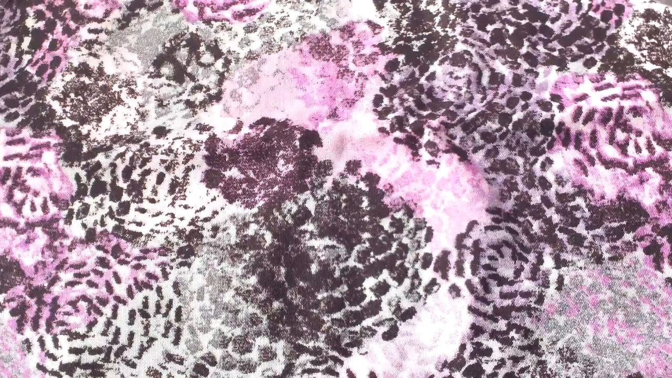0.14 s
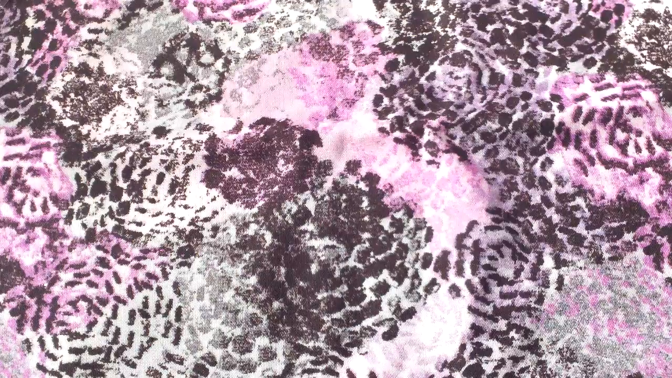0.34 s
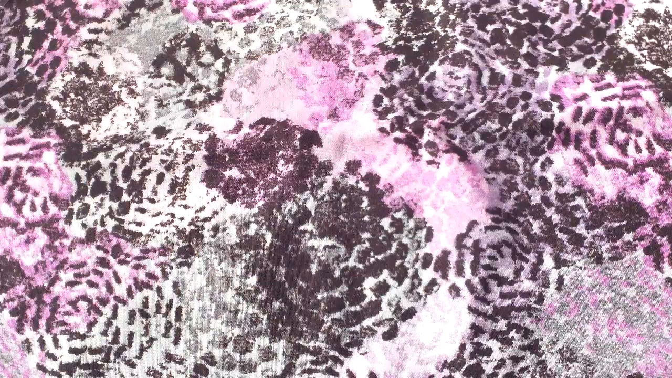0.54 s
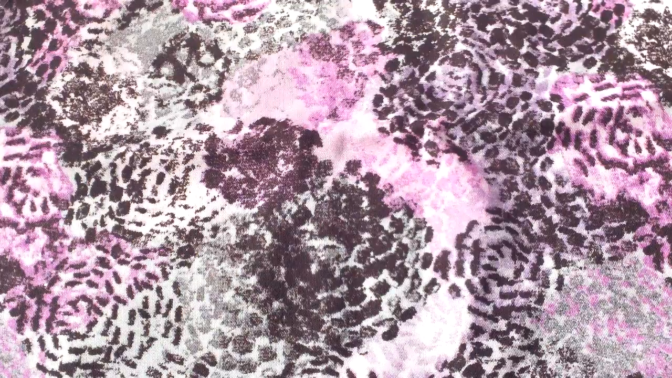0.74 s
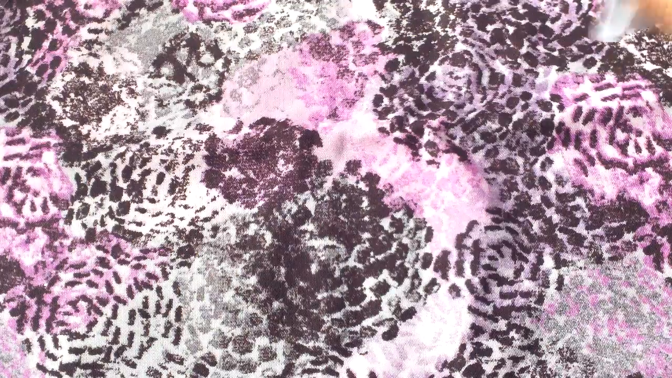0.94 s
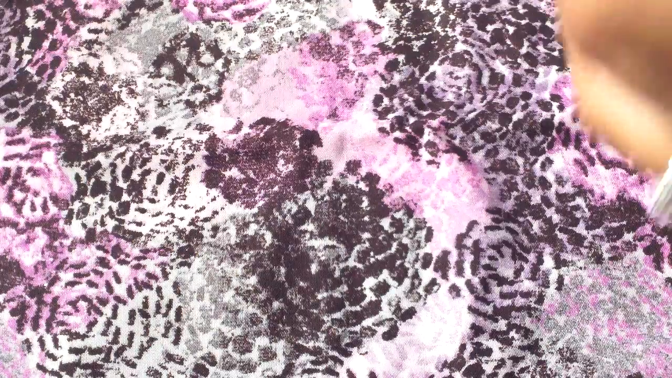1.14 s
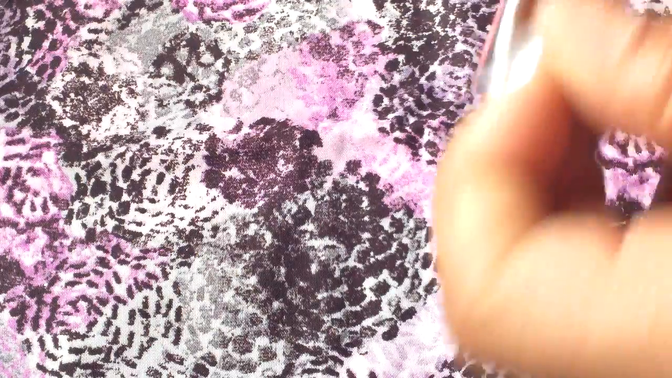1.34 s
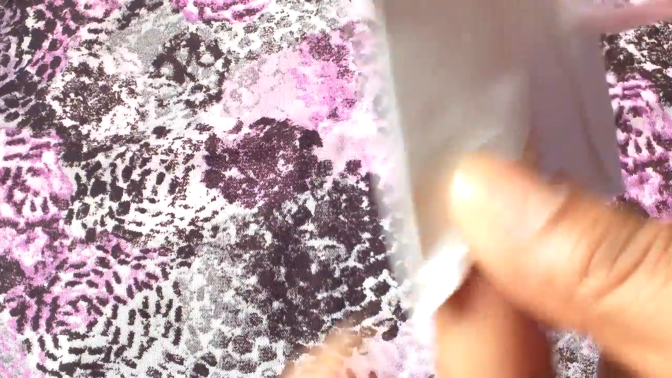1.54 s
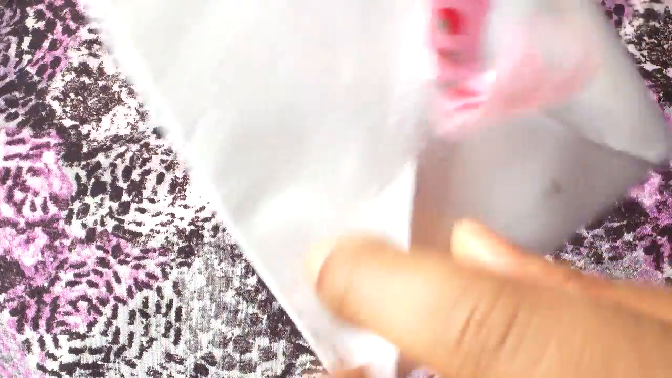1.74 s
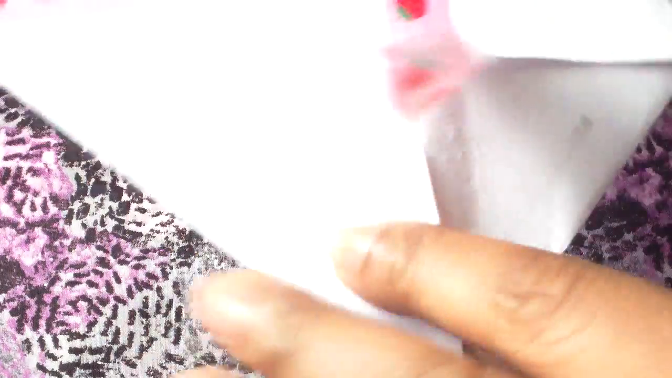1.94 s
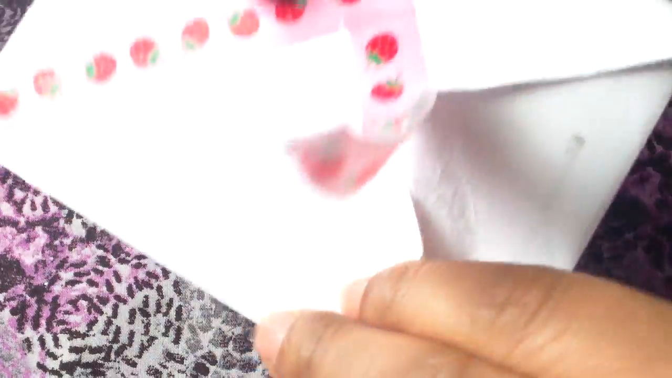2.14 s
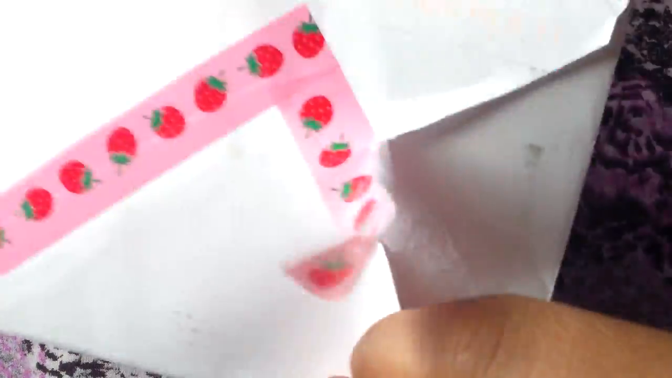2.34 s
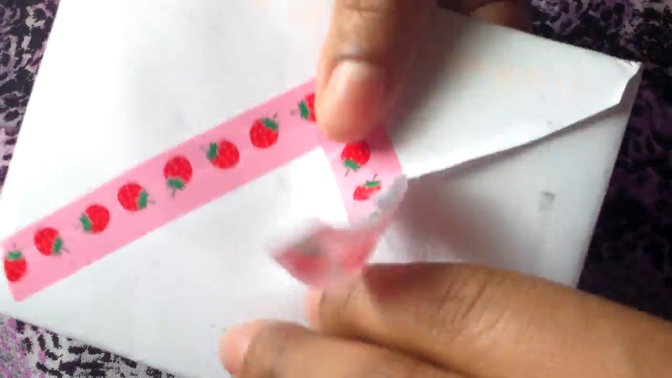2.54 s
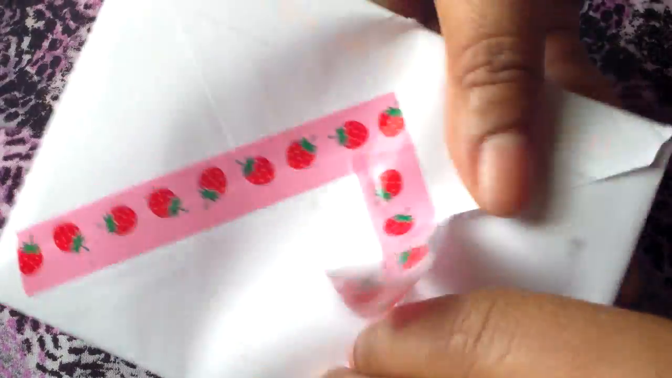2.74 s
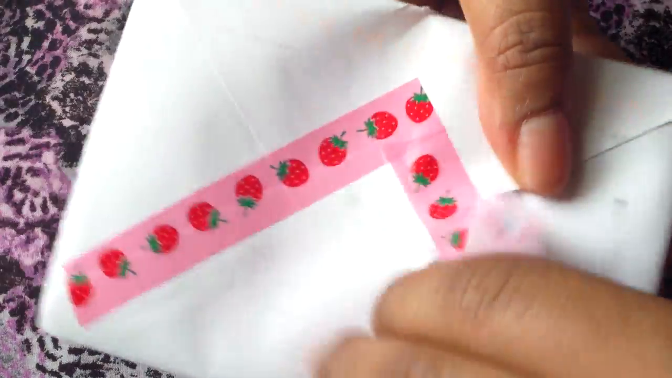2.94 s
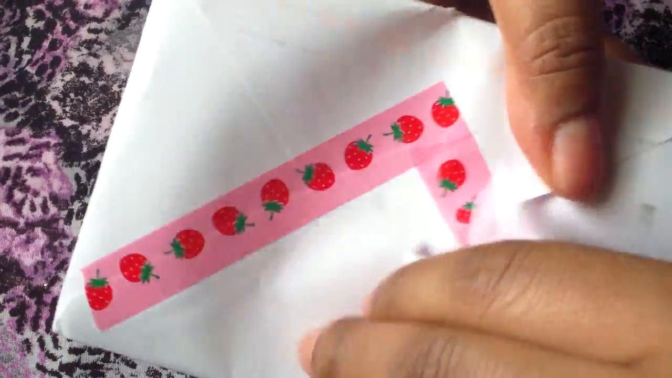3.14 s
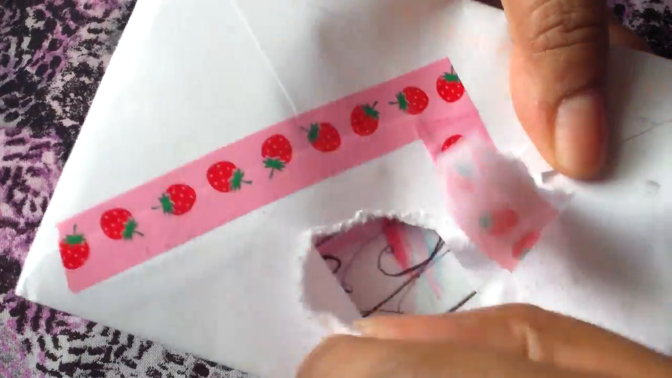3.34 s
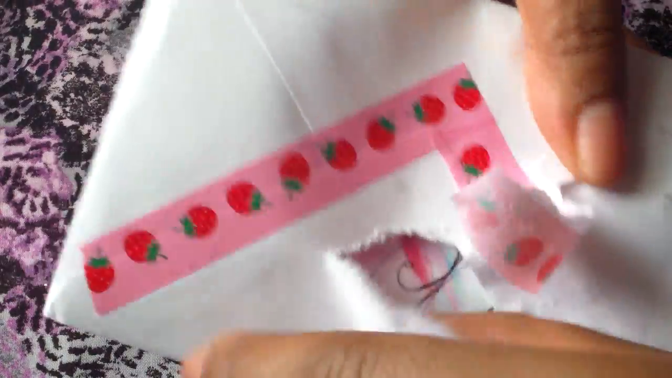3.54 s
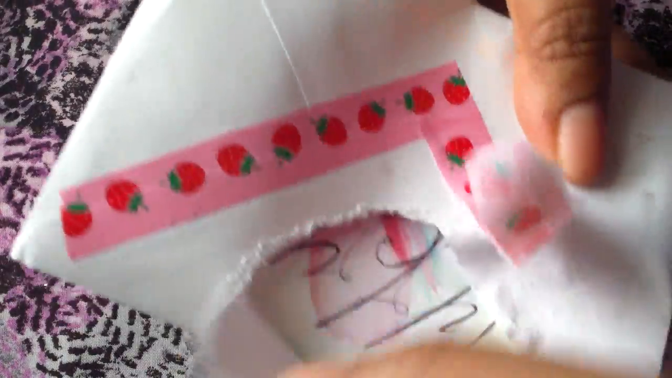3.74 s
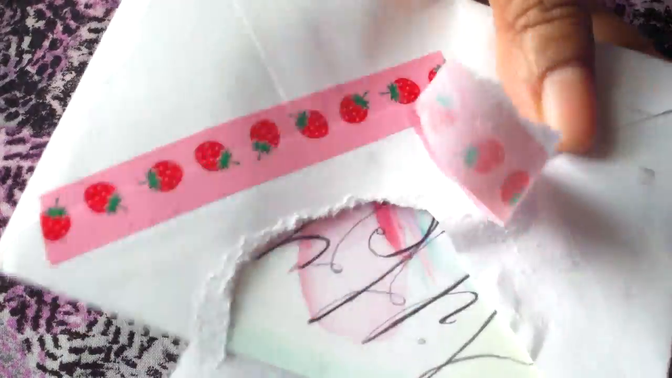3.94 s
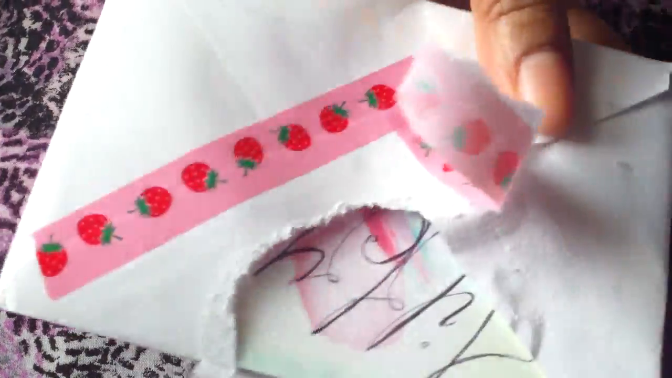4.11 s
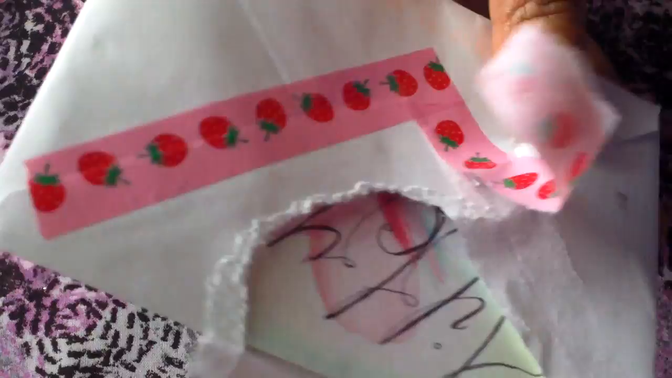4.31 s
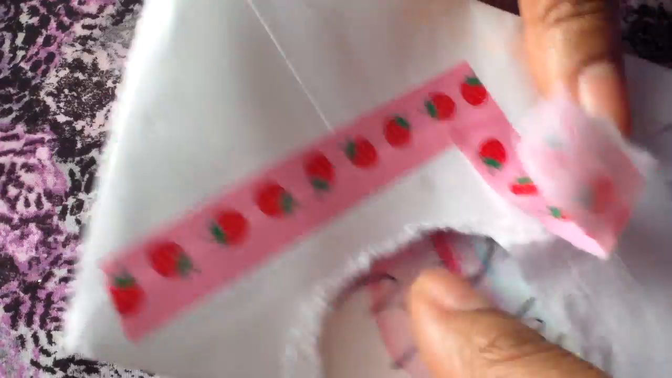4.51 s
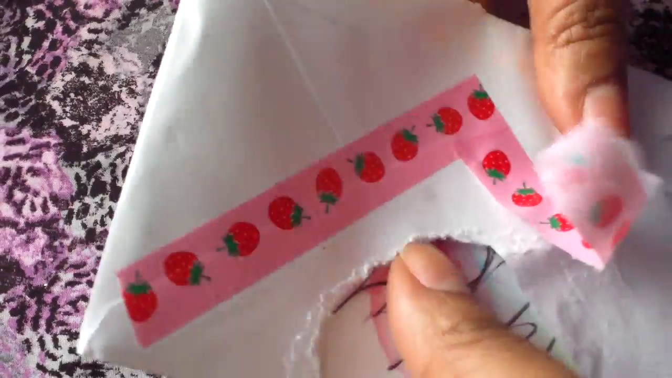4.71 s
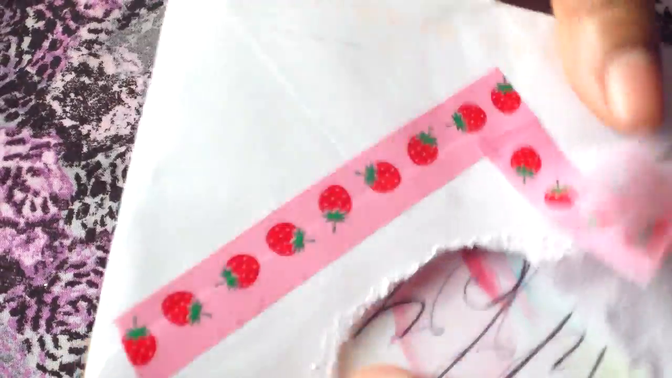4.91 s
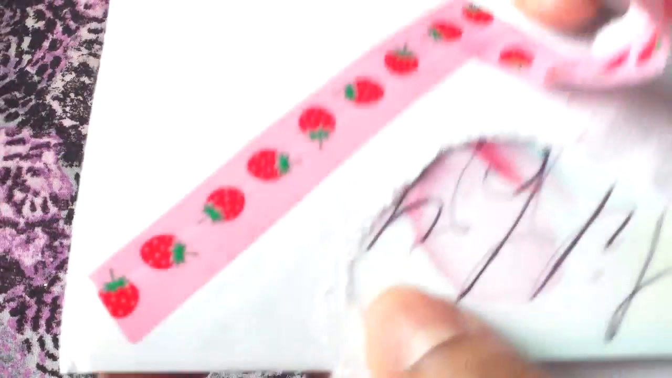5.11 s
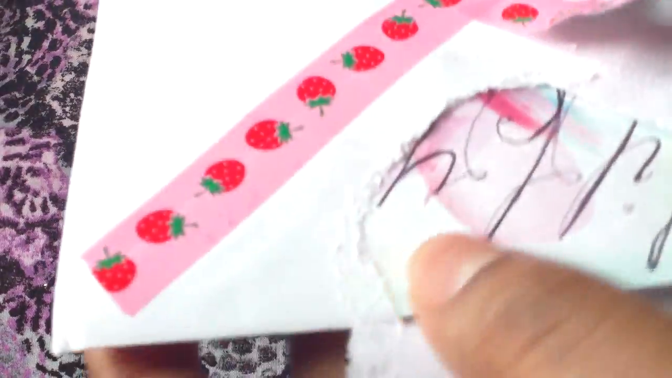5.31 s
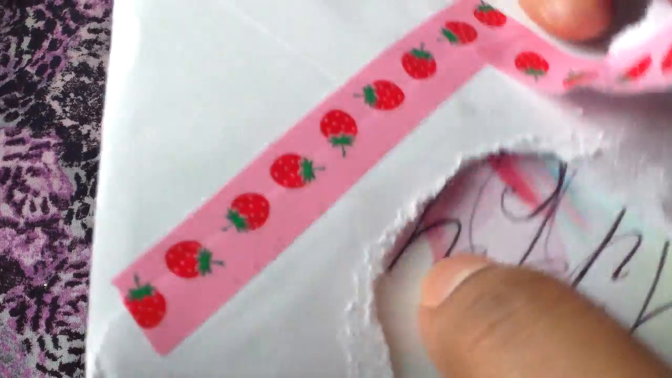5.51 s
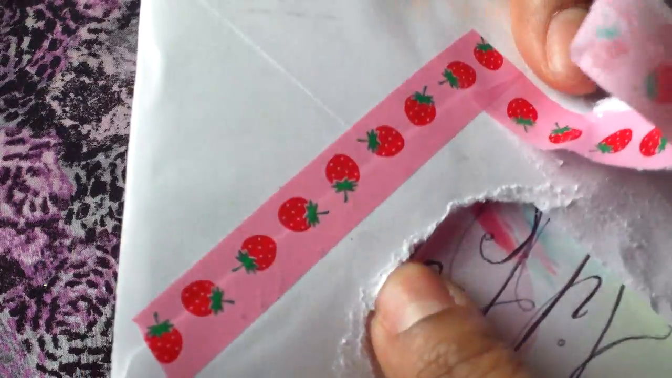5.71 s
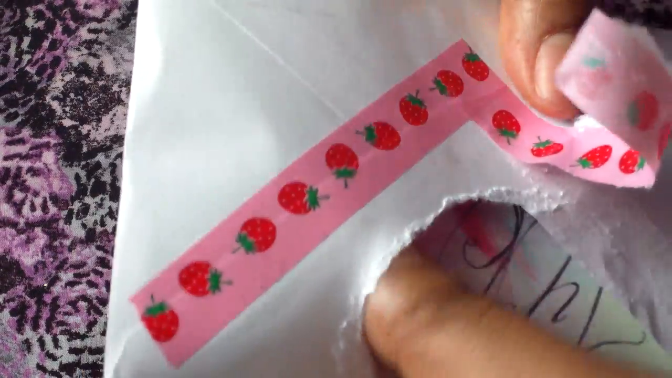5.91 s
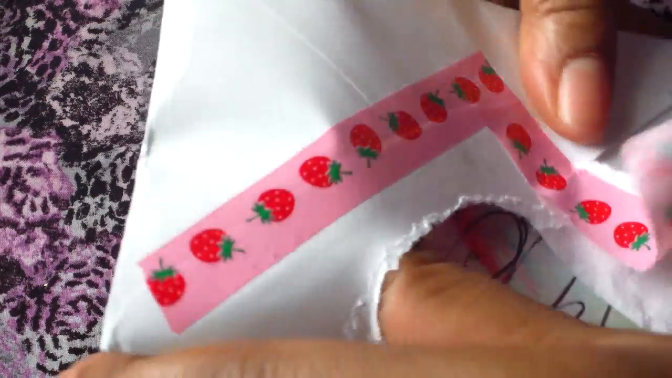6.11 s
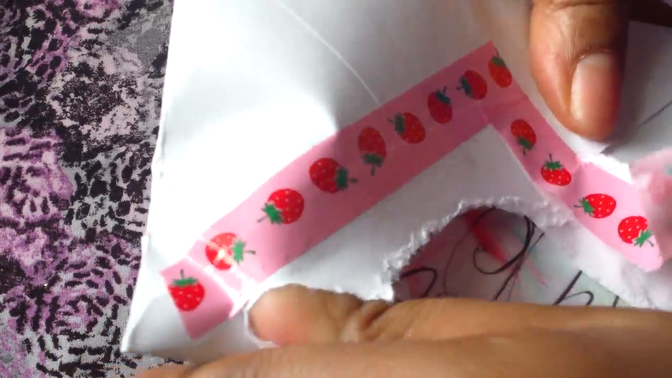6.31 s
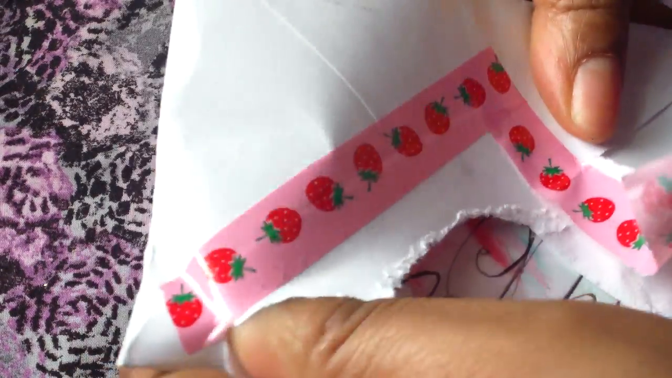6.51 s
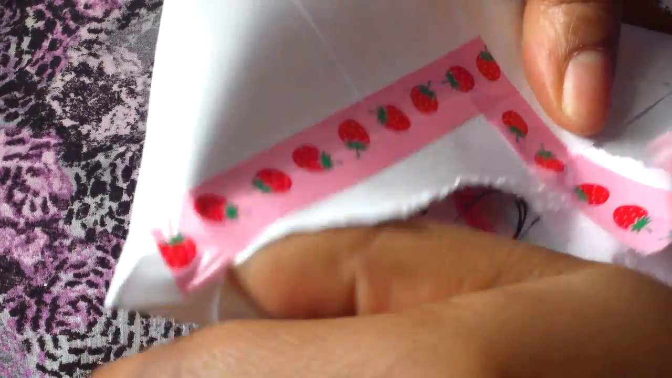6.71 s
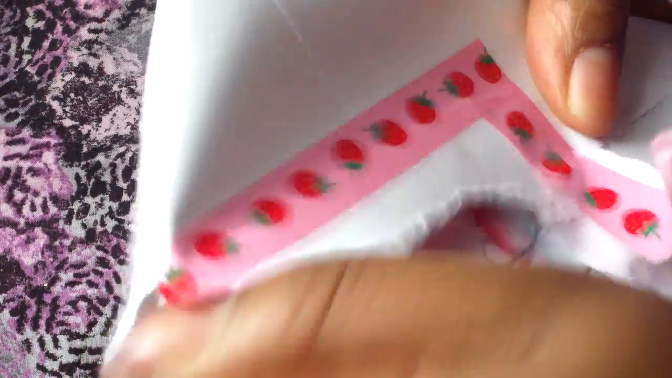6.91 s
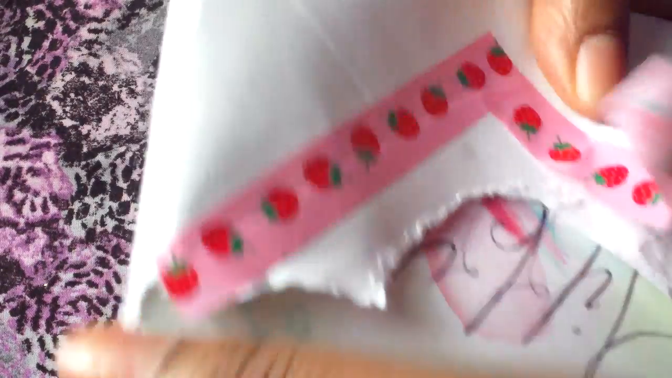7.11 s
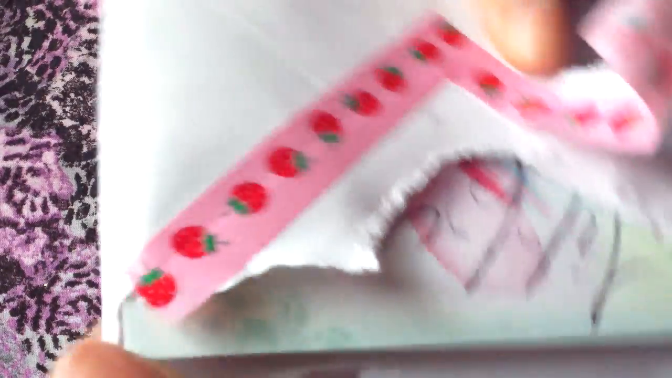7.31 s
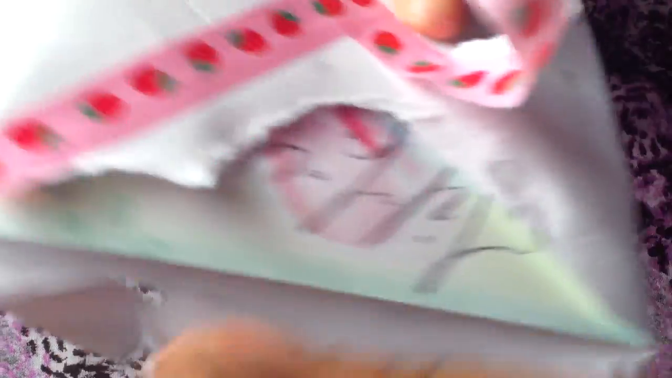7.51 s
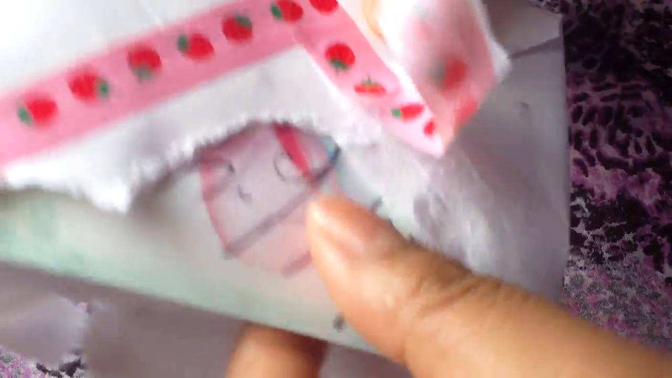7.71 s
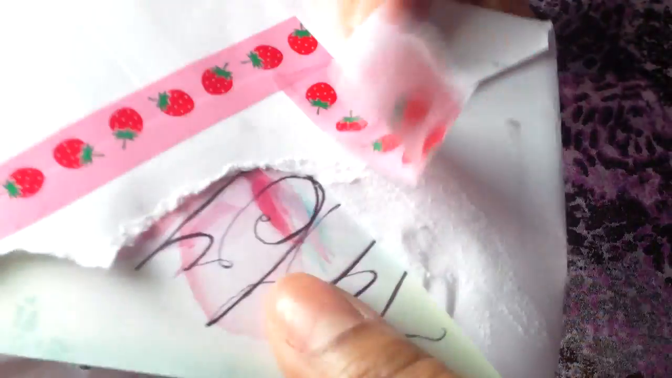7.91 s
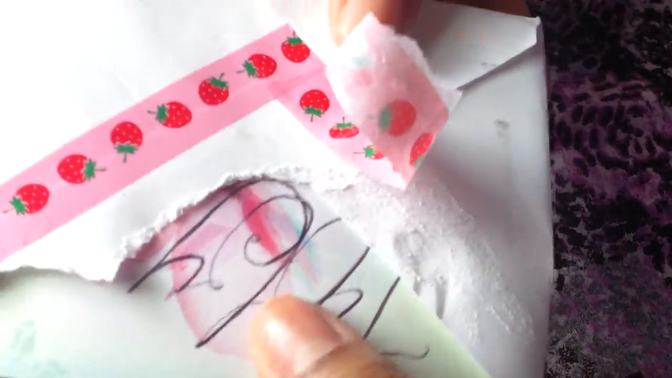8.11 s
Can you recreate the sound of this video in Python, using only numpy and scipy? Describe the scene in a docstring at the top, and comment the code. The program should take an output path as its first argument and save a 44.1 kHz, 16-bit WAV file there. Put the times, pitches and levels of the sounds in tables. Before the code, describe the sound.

Close, dry paper sounds: light crinkles and sharp creasing snaps, brief fibrous rips, finger rubbing and a final loud rustle over low room rumble.

```python
"""A paper envelope is picked up from a cloth and torn open by hand, close by in a quiet room.
Fingers slide and fibres break: random grains drive bands that follow the sheet's moving resonances.
Creases snap as damped noise bursts, the sheet pops as it flexes, and hands thud on the soft surface.
The flap resonance mostly sinks over the first six seconds, then sits higher.
Behind lie a low rumble, a faint hiss and a thin whirr that fades."""
import sys
import numpy as np
from scipy import signal
from scipy.fft import rfft, irfft, next_fast_len
from scipy.io import wavfile
from scipy.ndimage import uniform_filter1d

SR = 44100
rng = np.random.default_rng(int(sys.argv[2]) if len(sys.argv) > 2 else 0)


def master_out(mix):
    """Clip the mix to full scale and print it as 16-bit PCM to the path in sys.argv[1]."""
    frames = np.transpose(np.atleast_2d(mix))
    ceiling = np.clip(frames, -1, 1)
    pcm = np.round(ceiling * 32767).astype(np.int16)
    wavfile.write(sys.argv[1], SR, pcm)


N = 359547
TIME = np.arange(N) / SR


def undb(db):
    """Decibels to gain."""
    return 10 ** (np.asarray(db) / 20)


def unit(x):
    """Scale to rms 1."""
    return x / np.sqrt(np.mean(x ** 2) + 1e-18)


def burst(x, db):
    """Give a short sound the energy of 5 ms at this level."""
    return x * undb(db) / np.sqrt(np.sum(x ** 2) / (0.005 * SR))


def curves(table, at):
    """Each column of a timed table, interpolated at the given times."""
    s, *columns = np.transpose(table)
    return [np.interp(at, s, column) for column in columns]


def spectrum_db(points, hz):
    """Read a spectrum on a log-frequency axis."""
    point_hz, db = np.transpose(points)
    return np.interp(np.log(hz + 1), np.log(point_hz), db)


def colour(x, points):
    """Filter by a spectrum."""
    size = next_fast_len(N, real=True)
    gain = undb(spectrum_db(points, np.fft.rfftfreq(size, 1 / SR)))
    return irfft(rfft(x, size) * gain, size)[:N]


def ring(x, hz, q):
    """A damped resonance: two-pole band-pass of unit peak gain."""
    g = np.tan(np.pi * min(hz, 0.45 * SR) / SR)
    b = [g / q, 0, -g / q]
    a = [1 + g / q + g * g, 2 * (g * g - 1), 1 - g / q + g * g]
    return signal.lfilter(b, a, x)


def walk(rate_hz, at=TIME):
    """A random wander of spread near 1, with rate_hz new values per second."""
    return np.interp(at * rate_hz, np.arange(N // 20), rng.standard_normal(N // 20))


def add(out, s, x):
    """Mix a sound in at a time."""
    i = max(int(s * SR), 0)
    out[i:i + len(x)] += x[:max(N - i, 0)]


def background(rumble_db=-1, hiss_db=-64.0, whirr_hz=1780, whirr_q=9, whirr_db=-65, whirr_fade_s=0.66):
    """Coloured noises: uneven low rumble of room and handling, even hiss, and a resonant whirr that decays."""
    # rumble course: (time [s], level before the rumble_db trim [dB])
    rumble_course = [(0, -50.5), (1.4, -52.5), (2.04, -65), (2.31, -52), (2.8, -65.5), (3.24, -52),
                     (3.49, -59.5), (3.7, -48), (3.95, -64), (4.2, -51.5), (5.76, -51), (6.49, -59.5),
                     (7.1, -50), (7.19, -68), (7.4, -48), (7.52, -45.5), (8.15, -48)]
    # relative noise spectra: (frequency [Hz], density [dB per Hz])
    rumble_colour = [(20, 0.5), (55, -6), (78, -2), (98, -12.5), (124, -3.5), (160, -14.5), (260, -19.5),
                     (500, -27.5), (2000, -52)]
    hiss_colour = [(400, -12.5), (1500, -7.5), (8000, -19), (16000, -10)]
    rumble = unit(colour(rng.standard_normal(N), rumble_colour))
    rumble *= undb(curves(rumble_course, TIME)[0] + rumble_db)
    hiss = undb(hiss_db) * unit(colour(rng.standard_normal(N), hiss_colour))
    whirr = undb(whirr_db) * unit(ring(rng.standard_normal(N), whirr_hz, whirr_q))
    return rumble + hiss + whirr * np.exp(-TIME / whirr_fade_s)


def bumps(cycles=0.41):
    """Hands bump the soft surface: heavily damped sine thuds whose envelope peaks within the first half cycle."""
    # thuds: (time [s], envelope peak [dB], frequency [Hz])
    thuds = [(4.304, -38, 248), (5.579, -33, 171), (6.177, -40, 168), (7.631, -33, 48.3),
             (7.769, -40.5, 130), (7.943, -40, 45.3)]
    out, t = np.zeros(N), TIME[:SR // 4]
    for s, db, hz in thuds:
        age = t * hz / cycles
        envelope = age * np.exp(1 - age)
        add(out, s, undb(db) * envelope * np.sin(2 * np.pi * hz * t))
    return out


def flexes(q=1.0, rustle=0.077, decay_ms=4.0):
    """A wide patch of the sheet flips over: a kick and a little rustle ring as a short dull pop."""
    # pops: (time [s], level over 5 ms [dB], centre [Hz])
    pops = [(.513, -43.5, 500), (1.078, -47, 453), (1.108, -42.5, 720), (1.395, -37, 1000),
            (1.453, -44, 600), (1.49, -42, 480), (1.668, -32.5, 1250), (2.428, -37, 318),
            (2.474, -36.5, 490), (3.686, -38, 450), (3.955, -28, 1770), (4.302, -34.5, 670),
            (4.641, -45, 566), (4.862, -43.5, 800), (5.0116, -30, 624), (5.072, -44.5, 1190),
            (5.121, -48, 890), (5.1775, -40, 725), (5.351, -51, 515), (5.58, -36.5, 418), (5.752, -31, 570),
            (5.765, -36, 400), (5.951, -31, 794), (6.048, -33, 646), (6.178, -34.5, 543),
            (6.7436, -31.5, 690), (6.956, -46, 900), (7.767, -33.5, 478), (7.851, -32, 850),
            (8.031, -37, 840)]
    out, ms = np.zeros(N), np.arange(SR // 20) * 1000 / SR
    noises = rng.standard_normal((len(pops), len(ms)))
    for (s, db, hz), noise in zip(pops, noises):
        push = rustle * noise * np.exp(-ms / decay_ms)
        push[0] += 1
        x = ring(ring(push, hz, q), hz, 0.49)
        add(out, s, burst(x, db))
    return out


def bend(x, delay_ms):
    """Bending waves in paper are slower at low pitch: a click becomes a falling chirp (delay at 1 kHz)."""
    khz = np.fft.rfftfreq(len(x), 1 / SR) / 1000
    phase = 2 * np.pi * 2 * delay_ms * np.sqrt(khz)
    return irfft(rfft(x) * np.exp(-1j * phase), len(x))


def snaps(crack=1.68, q=1.0, skirt_q=0.017, tail_db=-28, tail_ms=2.8, delay_ms=0.396):
    """A crease buckles: one sharp crack, then a brief decaying flutter in the facet around it."""
    # creases: (time [s], level over 5 ms [dB], centre [Hz], decay, floored at 0.1 [ms])
    creases = [(0.1616, -40.5, 5200, 1), (0.4169, -31.5, 4740, 1.3), (0.482, -38, 8650, 0.65),
               (0.512, -40, 4000, 7.8), (0.6321, -36, 3140, 1.2), (0.6584, -27, 6250, 0.82),
               (0.681, -29.5, 8600, 3.7), (0.814, -36.5, 9500, 0.44), (1.0007, -34, 3250, 2.8),
               (1.1544, -25.5, 6600, 2.9), (1.283, -38, 8000, 0.6), (1.337, -35.5, 9450, 0.64),
               (1.3947, -25, 4630, 0.75), (1.461, -35, 7800, 1.2), (1.532, -35.5, 5630, 1.7),
               (1.659, -27, 9700, 0.46), (1.6677, -23.5, 1800, 0.19), (1.781, -41.5, 2270, 1.3),
               (1.9012, -31, 6400, 1.8), (2.482, -20.5, 3700, 0.071), (2.538, -40, 3750, 1.3),
               (2.662, -36, 2260, 4), (2.848, -39, 2200, 1.8), (2.9388, -31, 2230, 1.3),
               (2.961, -26.5, 2770, 1.5), (2.970, -34.5, 2600, 0.91), (3.0385, -32.5, 6200, 2.6),
               (3.203, -33.5, 7840, 3.3), (3.253, -38, 8300, 0.8), (3.272, -28, 6000, 0.99),
               (3.31, -37, 7400, 0.74), (3.5047, -34, 2870, 0.86), (3.6826, -31, 2480, 3.9),
               (3.805, -39.5, 6070, 0.56), (3.832, -30.5, 3400, 2), (3.857, -28, 6700, 0.66),
               (3.873, -32, 9100, 0.5), (3.8983, -31.5, 7000, 0.3), (4.019, -30.5, 9000, 1.2),
               (4.148, -35.5, 4900, 0.19), (4.641, -41.5, 3550, 1), (4.864, -42, 3430, 2.4),
               (5.0114, -26.5, 3300, 1), (5.1773, -41, 3030, 0.26), (5.578, -37, 1400, 0.25),
               (5.7657, -44, 2200, 1.8), (5.783, -30.5, 6400, 1.6), (5.981, -38, 4090, 0.5),
               (6.0255, -32, 5340, 0.31), (6.0541, -30.5, 5950, 0.49), (6.2004, -29.5, 3880, 0.28),
               (6.268, -43, 8200, 0.4), (6.2915, -36, 5330, 1.3), (6.303, -36, 7580, 0.27),
               (6.312, -40, 7360, 0.4), (6.3502, -28, 8800, 1.5), (6.362, -30, 5000, 1.2),
               (6.383, -36, 4240, 1.7), (6.507, -37, 2470, 1), (6.622, -36, 2800, 1.4),
               (6.6353, -34, 4620, 1.9), (6.647, -34, 1610, 1.2), (6.6578, -33, 2060, 1.6),
               (6.7429, -21.5, 2370, 3), (6.885, -32, 5100, 2.3), (7.1017, -24.5, 5150, 6.2),
               (7.113, -19.5, 3800, 4.3), (7.766, -28, 4230, 0.19)]
    out, ms = np.zeros(N), np.arange(SR // 30) * 1000 / SR
    noises = rng.standard_normal((len(creases), len(ms)))
    for (s, db, hz, decay_ms), noise in zip(creases, noises):
        push = noise * (np.exp(-ms / max(decay_ms, 0.1)) + undb(tail_db) * np.exp(-ms / tail_ms))
        push[0] += crack * np.sign(noise[-1])  # random polarity
        x = bend(ring(ring(push, hz, q), hz, skirt_q), delay_ms)
        add(out, s, burst(x, db))
    return out


def grains(rate, spread_db, decay_ms, scatter, jerk_db):
    """Random tiny breaks (rate per s) in jerky clusters, each with a short flutter of the sheet."""
    size = undb(spread_db * np.minimum(rng.standard_normal(N), 2))
    clicks = (rng.random(N) < rate / SR) * size
    keep = np.exp(-1000 / (decay_ms * SR))
    power = signal.lfilter([1 - keep], [1, -keep], clicks ** 2 + 1e-12)
    flutter = np.sqrt(power) * rng.standard_normal(N)
    x = (clicks * rng.choice([-1, 1], N) + scatter * flutter) * undb(jerk_db * walk(160))
    # the hand's pull sets the mean power over 40 ms, however the breaks fall
    return x / np.sqrt(uniform_filter1d(x ** 2, SR // 25) + 1e-6)


def fibres(tearing, rate, rasp=0.21, delay_ms=0.3):
    """Smooth friction mixed with small crease ticks; sharp breaks take over, short of rasp, in tearing."""
    # small creases: (time [s], share of ticks in the sliding power [0-1])
    crinkle_course = [(.6, 0.3), (1.5, 0.55), (3, 0.31)]
    rub = grains(12000, spread_db=1.5, decay_ms=0.64, scatter=1.5, jerk_db=1.3)
    ticks = grains(300, spread_db=3.3, decay_ms=0.4, scatter=1.5, jerk_db=1)
    breaks = grains(rate, spread_db=3.4, decay_ms=0.6, scatter=1.5, jerk_db=2.3)
    crinkle = np.clip(curves(crinkle_course, TIME)[0], 0, 1)
    slide = np.sqrt(1 - crinkle) * rub + np.sqrt(crinkle) * ticks
    share = tearing * np.clip(1 - rasp, 0, 1)
    return bend(np.sqrt(1 - share) * slide + np.sqrt(share) * breaks, delay_ms)


def stroke(at, peak, rise, fall, db, depth_db=16, touch_s=0.014):
    """Power of one slide: swells to a peak, fades to depth_db below it at the ends, then drops off fast."""
    away = np.maximum((peak - at) / rise, (at - peak) / fall)
    off_s = np.maximum(np.maximum(peak - rise - at, at - peak - fall), 0)
    return (undb(db - depth_db * away ** 0.83) * np.exp(-off_s / touch_s)) ** 2


def rip(at, start, length, db, growth_db, attack_s=0.0017, release_s=0.015):
    """Power of one rip: it catches at once, grows or eases while it runs, and dies away."""
    age = at - start
    edges = np.maximum(-age / attack_s, 0) + np.maximum((age - length) / release_s, 0)
    return (undb(db + growth_db * np.clip(age / length, 0, 1)) * np.exp(-edges)) ** 2


def blend(powers, rows):
    """Power-weighted mean of the rows over time: the strongest gesture of the moment prevails."""
    weight = np.array(powers) + 1e-20
    return np.transpose(rows) @ weight / weight.sum(axis=0)


def hands(at):
    """Gestures to sheet controls: level, tearing share of power, (brightness, flap Hz, flap dB), break rate."""
    # finger slides: (peak time [s], rise [s], fall [s], peak level [dB], brightness [dB per octave],
    # flap resonance [Hz], its height [dB])
    slides = [(.42, 1, 0.6, -54.5, 1.5, 1800, -1), (.615, 0.02, 0.059, -41.5, 5, 3500, -7),
              (0.683, 0.033, 0.078, -31, 7.5, 3600, -1), (1.17, 0.38, 0.13, -41.5, 2.9, 3400, 0.5),
              (1.238, 0.033, 0.072, -28.5, 6.5, 3300, 0), (1.384, 0.026, 0.11, -34, 4.5, 3100, -2),
              (1.658, 0.27, 0.019, -37.5, 6.5, 1900, 12.5), (1.892, 0.2, 0.022, -44.5, 3, 1920, 7),
              (2.067, 0.029, 0.022, -48, 2, 2070, 2), (2.172, 0.017, 0.025, -45.5, 2, 2200, 6),
              (2.269, 0.056, 0.47, -47, 0, 2340, 6.5), (2.432, 0.047, 0.045, -29.5, 2.5, 2290, 9),
              (2.56, 0.043, 0.27, -49.5, 1.5, 2450, 7), (2.675, 0.015, 0.043, -42, 4.5, 2450, 2),
              (2.92, .13, .02, -41, 3, 2460, -3), (3.151, 0.055, 0.036, -31.5, 2, 3220, 4),
              (3.619, 0.04, 0.026, -39.5, 3.5, 1480, 17), (3.679, 0.07, 0.084, -37, 3.5, 1510, 10),
              (4.289, 0.13, 0.069, -33, 4.5, 1080, 9), (4.46, 0.15, 0.035, -45.5, 2, 1060, 1),
              (4.539, 0.039, 0.017, -44, 3, 1190, 15.5), (4.722, 0.081, 0.096, -39.5, 2.5, 970, 9.5),
              (5.01, 0.066, 0.018, -36.5, 0.5, 965, 4.5), (5.04, 0.018, 0.23, -48, 2, 890, 8),
              (5.782, 0.2, 0.06, -39, 1, 686, 4.5), (5.823, 0.012, 0.0072, -27, 5.5, 4180, -5),
              (6.14, 0.27, 0.14, -40, 1.5, 2800, 5), (6.199, 0.07, 0.018, -33, 0, 2630, 2.5),
              (6.892, 0.19, 0.077, -36.5, 1.5, 2170, 8.5), (7.258, 0.04, 0.19, -45, 3, 1960, 3),
              (7.507, 0.12, 0.027, -34, 3, 2260, -6.5), (7.611, 0.074, 0.076, -29, 1, 6450, 4),
              (7.671, 0.031, 0.049, -30, 3, 2530, -1), (7.786, 0.054, 0.036, -30.5, 2.5, 4600, 2),
              (7.934, 0.13, 0.029, -24, 0, 3400, 9), (8.095, 0.091, 0.026, -30, 2.5, 2880, 0.5)]
    # runs of breaking fibres, ripped or crumpled: (start [s], length [s], start level [dB], growth [dB],
    # brightness [dB per octave], flap resonance [Hz], its height [dB], break rate [1/s])
    runs = [(2.922, 0.1, -37, 10, 2, 2560, 11, 2300), (3.212, 0.098, -47.5, 15, 1.5, 5630, 1.5, 255),
            (3.32, 0.056, -29.5, 3, 2, 5600, -2.5, 2750), (3.394, 0.092, -25.5, -6, 3, 2090, 16, 1430),
            (3.824, 0.036, -38.5, -6, 0, 1430, 14, 1100), (3.866, 0.13, -28.5, -3.5, 3.5, 1360, 12, 1550),
            (4.012, 0.082, -36.5, -19.5, 3.5, 1230, 13, 190), (4.097, 0.07, -41, -5, 2.5, 1210, 8.5, 227),
            (5.486, 0.028, -54, 11.5, 2.5, 2300, -4, 240),
            (5.955, 0.077, -28.5, -7.5, 1.5, 4050, 13.5, 780), (6.268, 0.12, -46.5, 10, 2.5, 1810, 12, 240),
            (6.401, 0.041, -29.5, -6, 2, 1640, 9, 590), (6.504, 0.15, -51, 10, -1.5, 394, 7, 170),
            (6.648, 0.052, -35, 1.5, 1, 1960, 8, 960), (6.997, 0.1036, -54.5, 21, -0.8, 2100, 4, 840)]
    # envelope merely held: (level [dB], brightness [dB per octave], flap resonance [Hz], its height [dB])
    hold = (-68, 0.5, 900, -2)
    sliding = [stroke(at, *row[:4]) for row in slides]
    ripping = [rip(at, *row[:4]) for row in runs]
    holding = np.full(len(at), undb(hold[0]) ** 2)
    powers = sliding + ripping + [holding]
    tones = [row[4:] for row in slides] + [row[4:7] for row in runs] + [hold[1:]]
    total = sum(powers)
    level_db = 10 * np.log10(total)
    rate = blend(ripping, [row[7] for row in runs])
    return level_db, sum(ripping) / total, blend(powers, tones), rate


def strips(at, hz, height_db=8, octaves=0.3):
    """Lift in dB from a strip pulled free: its resonance glides, swelling in and dying out with the pull."""
    # strips: (start [s], length [s], first resonance [Hz], last resonance [Hz])
    pulls = [(3.3, 0.21, 8500, 2400), (3.846, 0.16, 6900, 3500), (7.54, 0.082, 5030, 7800)]
    db = 0
    for start, length, from_hz, to_hz in pulls:
        run = np.clip((at - start) / length, 0, 1)
        centre_hz = from_hz * (to_hz / from_hz) ** run
        swell = np.sqrt(np.sin(np.pi * run))
        db = db + height_db * swell / (1 + (np.log2(hz / centre_hz) / octaves) ** 2)
    return db


def paper():
    """Friction and fibre breaks drive the sheet, which radiates through the moving flap resonance."""
    # relative spectra of sliding and tearing: (frequency [Hz], density [dB per Hz])
    rub_colour = [(100, 8), (260, 1.5), (500, 4), (900, 5.5), (1600, -0.5), (3200, 4), (6000, 2.5),
                  (9000, -0.5), (12000, -4), (16000, -18.5)]
    tear_colour = [(100, 3), (260, 4.5), (600, 7.5), (1000, 5), (2000, 3), (4000, 7), (6000, 6.5),
                   (9000, 4), (12000, 1), (16000, -10)]
    at = TIME[::64]  # control times
    level_db, tearing, (brightness, flap_hz, flap_db), rate = hands(at)
    size = next_fast_len(N, real=True)
    drive = rfft(fibres(np.interp(TIME, at, tearing), np.interp(TIME, at, rate)), size)

    centres_hz = np.geomspace(125, 16000, 22)
    hz = centres_hz[:, None]
    octaves = np.log2(hz / flap_hz)
    db = spectrum_db(rub_colour, hz) * (1 - tearing) + spectrum_db(tear_colour, hz) * tearing
    db = db + brightness * octaves + flap_db / (1 + (octaves / 0.5) ** 2)
    # the bending sheet keeps shifting its smaller resonances; tearing adds a faster flicker of colour
    flicker = [1.9 * walk(25, at) + 2.6 * tearing * walk(250, at) for _ in centres_hz]
    db = db + strips(at, hz) + np.array(flicker)

    # scale so that the bands together have the gestures' level
    gain = undb(db)
    widths_hz = np.gradient(centres_hz)[:, None]
    gain *= undb(level_db) / np.sqrt(np.sum(gain ** 2 * widths_hz, axis=0) / (SR / 2))

    # overlapping bands split the drive, and each follows its own gain
    bin_hz = np.fft.rfftfreq(size, 1 / SR)
    place = np.interp(np.log(bin_hz + 1), np.log(centres_hz), np.arange(len(hz)))
    out = np.zeros(N)
    for k, band_gain in enumerate(gain):
        band = irfft(drive * np.maximum(1 - abs(place - k), 0), size)[:N]
        out += np.interp(TIME, at, band_gain) * band
    return out


def reflect(x, gain=0.18, lag_ms=0.836, sway_ms=0.28):
    """The moving hand throws the sound back after a wandering short lag, combing its spectrum."""
    lag_s = (lag_ms + sway_ms * walk(4)) / 1000
    return (x + gain * np.interp(TIME - lag_s, TIME, x)) / np.sqrt(1 + gain ** 2)


def room(x, t60_s=0.098, wet_db=-21):
    """A faint, short echo from the furnished room: decaying noise, broadly band-passed."""
    t = TIME[:SR // 2]
    tail = rng.standard_normal(len(t)) * np.exp(-np.log(1000) * t / t60_s) * (t > 0.004)
    tail = ring(tail, 1500, 0.08)
    return x + undb(wet_db) * signal.fftconvolve(x, tail / np.sqrt(np.sum(tail ** 2)))[:N]


def scene():
    """The envelope in the room, over thuds and background."""
    envelope = paper() + snaps() + flexes()
    return (room(reflect(envelope)) + bumps() + background())[None]


def record(dry):
    """The microphone port rings in the upper treble, and the top is cut at 15.9 kHz."""
    # microphone response: (frequency [Hz], gain [dB])
    response = [(20, 8), (1950, 3), (2650, 0.5), (3300, 1.5), (4700, 0), (5550, 1.5), (7000, -1),
                (8300, 8.5), (9300, 5.5), (10500, -0.5), (12500, -5), (16000, -2.5)]
    top_cut = signal.ellip(10, 0.2, 80, 15900, fs=SR, output="sos")
    return signal.sosfilt(top_cut, colour(dry[0], response))[None]


dry = scene()
out = record(dry)
master_out(out)
```